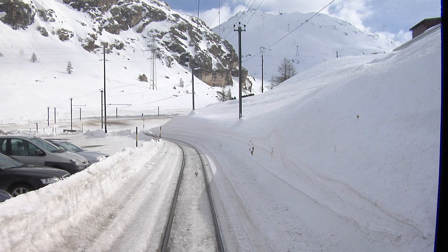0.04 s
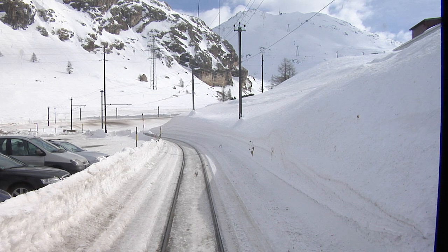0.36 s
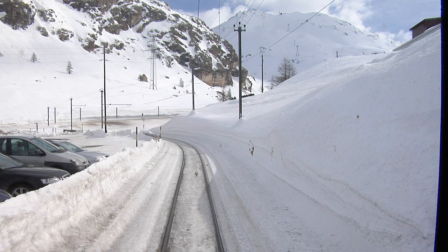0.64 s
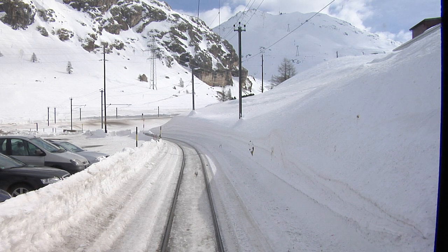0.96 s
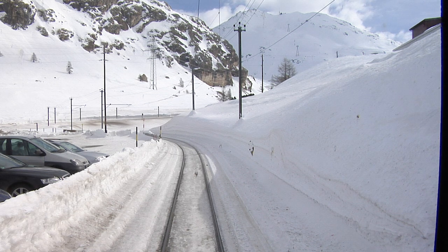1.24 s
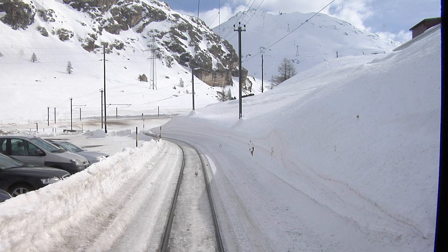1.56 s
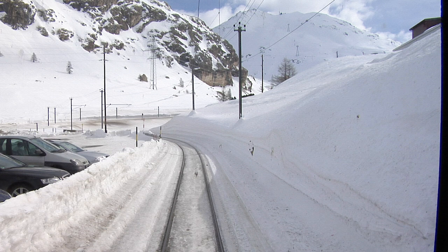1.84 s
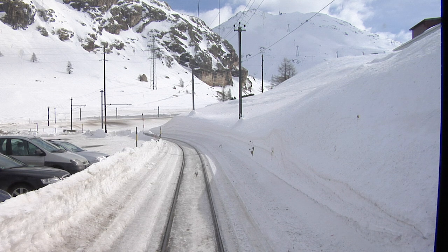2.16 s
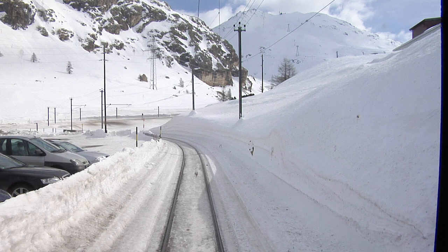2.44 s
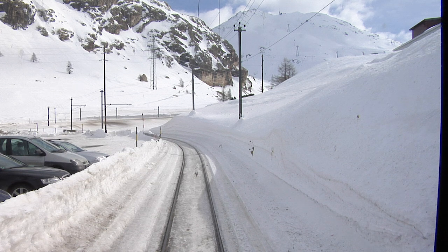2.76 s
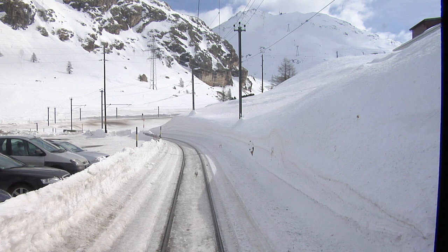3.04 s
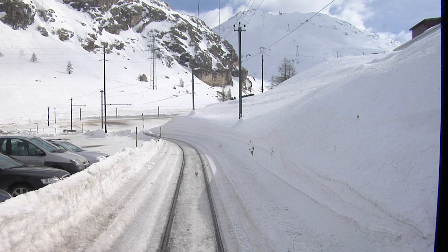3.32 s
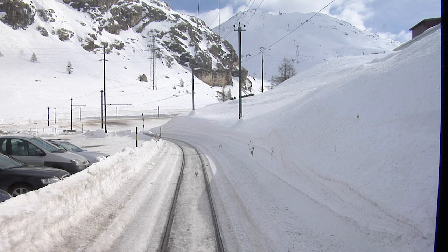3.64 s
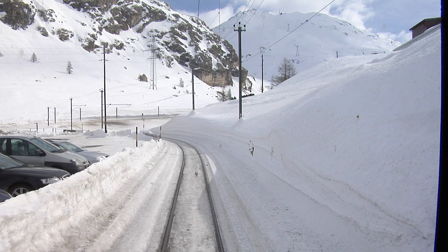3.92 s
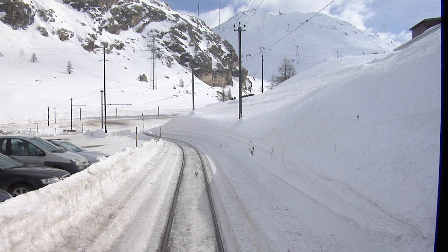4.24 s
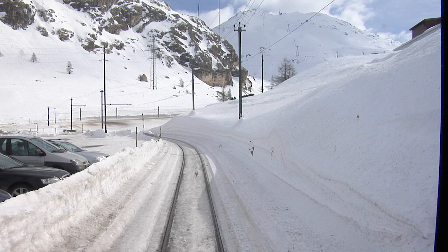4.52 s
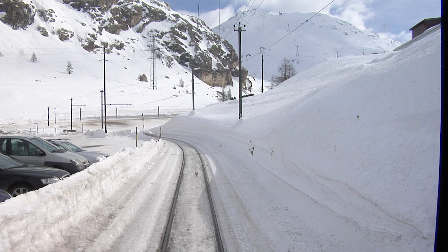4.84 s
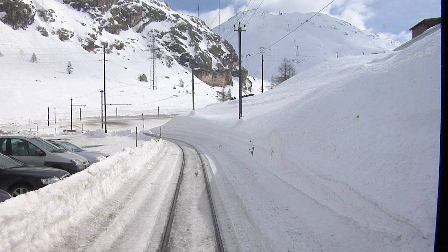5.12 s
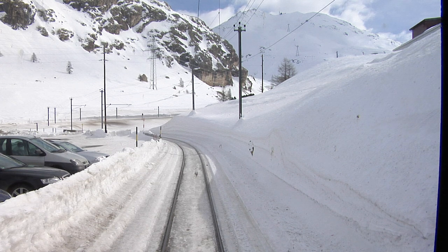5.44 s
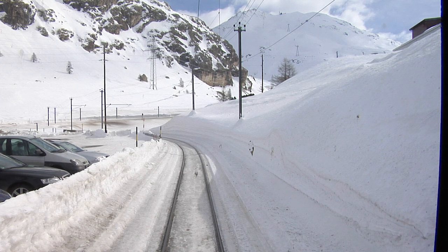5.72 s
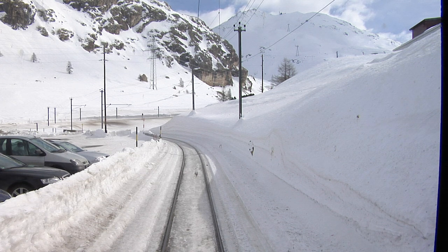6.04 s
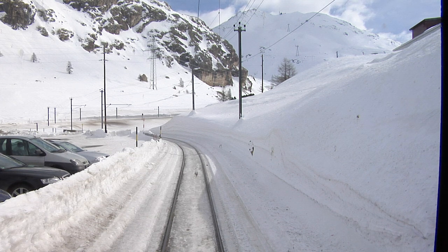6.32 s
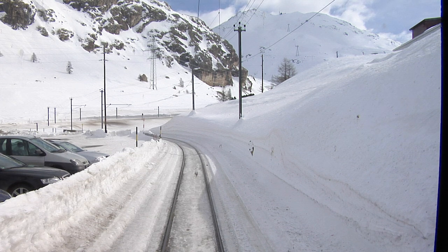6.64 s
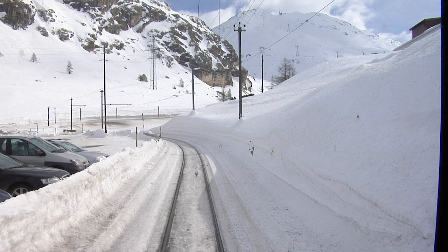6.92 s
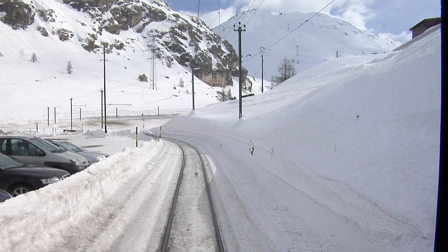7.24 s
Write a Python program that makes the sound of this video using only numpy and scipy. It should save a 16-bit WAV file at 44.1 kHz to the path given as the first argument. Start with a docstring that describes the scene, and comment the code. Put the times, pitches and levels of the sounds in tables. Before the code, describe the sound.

A steady two-toned hum from electrical equipment and a fan dominates the enclosed cab of a waiting train, heard from inside with a faint buzz and gently moving air. Early on, clothing rubs quietly against a seat in two short bouts, the second with brief squeaky creaks. The hum carries on alone for a while, until the cab body gives a few muffled low thuds toward the end.

```python
"""The cab of an electric train, standing with its equipment running.
Rectifier ripple and a cooling blower hum as two strong low tones, each part of a harmonic series,
under a thin buzz, faint wandering motor tones and a soft rush of air that excites the cab's resonances.
Someone shifts in the seat: friction rustles the cloth, and stick-slip gives small creaks.
Near the end the damped low modes of the cab body sound a few soft thuds."""
import sys
import numpy as np
from scipy import signal
from scipy.fft import rfft, irfft, next_fast_len
from scipy.io import wavfile

SR = 44100
rng = np.random.default_rng(int(sys.argv[2]) if len(sys.argv) > 2 else 0)


def dump(signal):
    """Clip the signal to [-1, 1] and save it as 16-bit WAV at the path in sys.argv[1]."""
    limited = np.clip(np.atleast_2d(signal).T, -1, 1)
    pcm = np.round(limited * 32767).astype(np.int16)
    wavfile.write(sys.argv[1], SR, pcm)


N = 321048
TIME = np.arange(N) / SR

# Strongest tones of the hum: supply_multiple, level_db, change_after_move_db
SUPPLY_HARMONICS = [(4, -67, 0), (6, -37.7, -.3), (8, -73, 3), (12, -60, .5), (32, -73, 1),
                    (34, -75.3, 5.3), (38, -82, 4), (46, -76, -2), (72, -83, 3), (108, -87.5, .5)]
# Line levels of the transformer core, on even multiples: frequency_hz, level_db
CORE_SPECTRUM = [(1200, -77.5), (1400, -93), (2000, -76.5), (2200, -88), (2520, -80.5), (2700, -96),
                 (4000, -108)]
# Line levels of the six-pulse rectifier, on each sixth multiple and its neighbours: frequency_hz, level_db
RECTIFIER_SPECTRUM = [(2400, -92.5), (3150, -86), (3700, -92.5), (4300, -90.5), (4600, -100.5), (5500, -94),
                      (6600, -100), (8500, -108)]
# Line levels of the faint buzz, on every multiple: frequency_hz, level_db
BUZZ_SPECTRUM = [(2400, -96.5), (3600, -99), (5400, -104), (8500, -112)]

def electrical_hum(moved, supply_hz, scatter_db):
    """Harmonic series locked to the supply; the sixth harmonic, the rectifier ripple, dominates."""
    cycles = supply_hz * TIME
    hum = sum(from_db(db + change * moved) * tone(k * cycles) for k, db, change in SUPPLY_HARMONICS)
    strongest = [row[0] for row in SUPPLY_HARMONICS]
    for k in range(24, 168):
        spectra = [BUZZ_SPECTRUM]
        if k % 2 == 0:
            spectra.append(CORE_SPECTRUM)
        if k % 6 in (0, 1, 5):
            spectra.append(RECTIFIER_SPECTRUM)
        db = max(at_hz(spectrum, k * supply_hz) for spectrum in spectra)
        db += scatter_db * rng.uniform(-1, 1)   # panels pass some multiples better than others
        if k not in strongest:
            hum += from_db(db) * tone(k * cycles)
    return hum


# Strongest tones of the blower: shaft_multiple, level_db, change_after_move_db
SHAFT_HARMONICS = [(6, -70, 2), (8, -44.5, -1.3), (12, -56, -.7), (15, -73, 3), (16, -58.2, -3),
                   (17, -72, 3), (20, -67, -1), (24, -59.4, -.8), (40, -64.7, -13.7), (51, -76.5, 1)]

def blower(moved, shaft_hz, wobble, flutter_db):
    """Harmonics of one slightly unsteady shaft; turbulence modulates the amplitude of each."""
    turns = shaft_hz * (TIME + wobble * np.cumsum(drift(0.82)) / SR)
    # weaker overtones: -79 dB at 1 kHz, falling 1 dB per octave
    weak = [(k, -79 - np.log2(k * shaft_hz / 1000), 0) for k in (28, 32, 44, 48, 60)]
    return sum(from_db(db + change * moved + flutter_db * drift(4.1)) * tone(k * turns)
               for k, db, change in SHAFT_HARMONICS + weak)


# Pushes on the cab body: start_s, relative_level_db
PUSHES = [(6.19, -55), (6.497, -40), (6.711, -53), (6.985, -40), (7.189, -53)]
# Its lowest modes: frequency_hz, relative_level_db, decay_60_db_s
BODY_MODES = [(26.4, -2.5, 0.54), (34.5, -2, .3), (57, -8.5, 0.36), (88, -5.5, 0.3)]

def thuds(rise_s, gain_db):
    """Damped modal vibration: each soft push builds up in the body and decays exponentially."""
    out = np.zeros(N)
    for start_s, push_db in PUSHES:
        age = np.maximum(TIME - start_s, 0)
        build = 1 - np.exp(-(age / rise_s) ** 2)
        for hz, mode_db, t60 in BODY_MODES:
            out += build * from_db(gain_db + push_db + mode_db - 60 * age / t60) * tone(hz * age)
    return out


# How hard the sitter presses on the seat: time_s, relative_level_db
SEAT_LOAD = [(.12, -75), (.3, -59), (.82, -48.5), (.95, -75), (1.8, -68), (1.98, -52), (2.33, -55),
             (2.56, -47.5), (2.8, -51.5), (3.02, -76)]

def seat_effort():
    """Amplitude envelope of the friction: the load on the seat comes in two bouts."""
    return from_db(np.interp(TIME, *np.transpose(SEAT_LOAD)))


# Quick rubs of cloth: peak_s, relative_level_db
CLOTH_RUBS = [(.241, -58), (.313, -63), (.372, -62), (.474, -63), (.556, -65), (.654, -63), (.721, -62),
              (.781, -60.5), (.852, -64), (1.982, -63), (2.419, -65), (2.622, -60), (2.787, -60.5),
              (2.866, -65), (2.945, -67)]
# Spectrum of sliding cloth: frequency_hz, relative_density_db
CLOTH_SPECTRUM = [(250, -10), (500, 3), (850, 3), (1300, -1), (1800, -4), (2300, -1), (2800, 1.5),
                  (3400, -4), (4300, -14), (8000, -30), (15000, -55)]
# Spectrum of the seat under it: frequency_hz, relative_density_db
SEAT_SPECTRUM = [(60, -22), (100, -25), (132, -1.5), (210, 1), (280, -5), (340, 3.5), (450, -13),
                 (620, -13), (800, -16.5), (1200, -50)]

def rustles(effort, cloth_rub_db, cloth_effort_db, seat_rub_db, seat_effort_db):
    """Friction noise: cloth slips finely and the seat rumbles; rubs and effort add in power."""
    # a rub catches quickly and lets go more slowly
    rubs = sum(from_db(db) * np.where(TIME < peak_s, swell(peak_s, 0.0112), swell(peak_s, 0.044))
               for peak_s, db in CLOTH_RUBS)
    grains = rms_one(colour(friction(per_s=2200, spread_db=6.0), CLOTH_SPECTRUM))
    rumble = rms_one(colour(rng.standard_normal(N), SEAT_SPECTRUM))
    cloth_gain = np.hypot(from_db(cloth_rub_db) * rubs, from_db(cloth_effort_db) * effort)
    seat_gain = np.hypot(from_db(seat_rub_db) * rubs, from_db(seat_effort_db) * effort)
    return cloth_gain * grains + seat_gain * rumble


# Creaks of the seat: peak_s, length_s, relative_level_db, pitch_hz
SEAT_CREAKS = [(2.07, 0.31, -54.5, 937), (2.687, .045, -47.5, 884), (2.805, 0.071, -49.5, 1030),
               (2.882, 0.024, -55.5, 900), (2.953, 0.034, -53.5, 896)]
# Low and high resonances of its frame: frequency_hz, bandwidth_hz, relative_level_db
FRAME_LOW_MODES = [(882, 130, 4.5), (916, 47, 2.5), (983, 36, -5)]
FRAME_HIGH_MODES = [(1660, 100, 2), (2003, 170, -1), (2350, 180, -7)]

def creaks(effort, creak_db, strain_db, snap_db, padding_hz):
    """Stick-slip excitation: slips, low-passed by the padding, ring the seat frame."""
    creaking = sum(from_db(db) * swell(peak_s, length_s) for peak_s, length_s, db, _ in SEAT_CREAKS)
    low_gain = np.hypot(from_db(creak_db) * creaking, from_db(strain_db) * effort)
    high_gain = from_db(snap_db) * swell(peak_s=2.797, length_s=0.04)   # the frame gives way once
    padding = signal.butter(2, padding_hz, fs=SR, output="sos")
    slips = signal.sosfilt(padding, friction(per_s=820, spread_db=2.5))
    low_ring = rms_one(resonate(slips, FRAME_LOW_MODES))
    high_ring = rms_one(resonate(slips, FRAME_HIGH_MODES))
    return low_gain * low_ring + high_gain * high_ring


def squeaks(gain_db, waver, steady_s):
    """Periodic stick-slip: a short creak locks into a wavering pitch; a long one stays mostly a scuff."""
    out = np.zeros(N)
    for peak_s, length_s, db, hz in SEAT_CREAKS:
        locked = min(1, steady_s / length_s)
        cycles = hz * np.cumsum(1 + waver * drift(39.3)) / SR
        out += from_db(db + gain_db) * locked * swell(peak_s, length_s) * tone(cycles)
    return out


# Tones of the smaller motors: pitch_hz, level_db, wander_hz
MOTOR_TONES = [(239.6, -56.5, .6), (244.3, -62, .6), (569.3, -63, 1.2), (153.4, -64, 1.5), (895, -71.5, .6)]

def motors():
    """Random frequency modulation makes each tone wander; the close pair beats by interference."""
    return sum(from_db(db) * tone(hz * TIME + wander_hz * np.cumsum(drift(1.69)) / SR)
               for hz, db, wander_hz in MOTOR_TONES)


# Spectrum of the rush and hiss: frequency_hz, relative_density_db
AIR_SPECTRUM = [(20, -101), (60, -82), (110, -75.5), (200, -84), (320, -80.5), (450, -83.5), (620, -85),
                (720, -88.5), (900, -90), (1700, -95.5), (2500, -102.6), (3600, -108.9), (7000, -112.3),
                (15000, -114.4)]
# Air resonances of the cab: frequency_hz, bandwidth_hz, relative_level_db
CAVITY_MODES = [(26, 5, -70), (43.3, 4, -68), (89.7, 20.6, -61.5), (129, 4.4, -67.5), (154.7, 3.7, -66.5),
                (187, 20, -61.5), (209, 12, -68.5), (284.2, 10, -58.5), (330.5, 34, -63), (477.7, 16, -65),
                (579, 48, -66.5), (627, 14, -70), (860, 13, -75.5), (1256, 44, -75.5), (1760, 26, -77),
                (2000, 39, -83.5)]

def air(rush_db, modes_db):
    """Broadband excitation: moving air rushes and keeps the cab's resonances sounding."""
    white = rng.standard_normal(N) * np.sqrt(SR / 2)   # unit power per hertz
    rush = colour(white, AIR_SPECTRUM)
    resonances = resonate(rng.standard_normal(N), CAVITY_MODES)
    return from_db(rush_db) * rush + from_db(modes_db) * resonances


def friction(per_s, spread_db):
    """Poisson impulse train: tiny slips of uneven size at random moments."""
    slipping = rng.random(N) < per_s / SR
    return slipping * rng.choice([-1, 1], N) * from_db(spread_db * rng.standard_normal(N))


def resonate(x, modes):
    """Modal superposition: parallel resonators of alternating sign, each at its own rms level."""
    out = np.zeros(N)
    for k, (hz, bandwidth_hz, db) in enumerate(modes):
        radius = np.exp(-np.pi * bandwidth_hz / SR)
        feedback = [1, -2 * radius * np.cos(2 * np.pi * hz / SR), radius * radius]
        out += (-1) ** k * from_db(db) * rms_one(signal.lfilter([1, 0, -1], feedback, x))
    return out


def colour(x, spectrum):
    """Spectral shaping, with a roll-off below the 16 Hz limit of hearing."""
    size = next_fast_len(N)
    hz = np.arange(size // 2 + 1) * SR / size
    audible = 1 - np.exp(-(hz / 16) ** 4)
    return irfft(rfft(x, size) * from_db(at_hz(spectrum, hz)) * audible, size)[:N]


def drift(corner_hz):
    """Low-passed Gaussian noise: a slow fluctuation of rms 1."""
    hop, settle = 100, 1000
    pole = np.exp(-2 * np.pi * corner_hz * hop / SR)
    noise = rng.standard_normal(N // hop + settle + 2)
    slow = signal.lfilter([1], [1, -2 * pole, pole * pole], noise)[settle:]
    return np.interp(np.arange(N) / hop, np.arange(len(slow)), rms_one(slow))


def swell(peak_s, length_s):
    """Gaussian envelope, two standard deviations to the length."""
    return np.exp(-np.minimum(2 * ((TIME - peak_s) / length_s) ** 2, 25))


def tone(cycles):
    """Sinusoid of rms 1 with a random starting phase."""
    return np.sqrt(2) * np.sin(2 * np.pi * (cycles + rng.random()))


def at_hz(spectrum, hz):
    """Interpolation of levels on a log-frequency axis."""
    freqs, levels = np.transpose(spectrum)
    return np.interp(np.log(np.maximum(hz, 1)), np.log(freqs), levels)


def rms_one(x):
    """Normalisation to an rms of 1."""
    return x / np.sqrt(np.mean(x ** 2) + 1e-20)


def from_db(db):
    """Decibels to amplitude ratio."""
    return 10 ** (np.asarray(db) / 20)


def scene():
    """Superposition of steady machinery, small movements and air, in one channel."""
    # a body moving in the cab shifts its standing waves, so the loud tones settle at new levels
    move_start_s, move_end_s = 2.1, 2.8
    moved = np.interp(TIME, [move_start_s, move_end_s], [0, 1])
    hum = electrical_hum(moved, supply_hz=50.451, scatter_db=3)
    machinery = hum + blower(moved, shaft_hz=24.75, wobble=0.0006, flutter_db=0.43) + motors()
    effort = seat_effort()
    seat = rustles(effort, cloth_rub_db=-1.5, cloth_effort_db=-20, seat_rub_db=11.5, seat_effort_db=2.5)
    seat += creaks(effort, creak_db=-3, strain_db=-12.5, snap_db=-51.5, padding_hz=2830)
    seat += squeaks(gain_db=-4.0, waver=0.02, steady_s=0.045)
    body = thuds(rise_s=0.055, gain_db=10.5)
    return (machinery + seat + body + air(rush_db=-0.15, modes_db=1.2))[None]


def record(dry):
    """Band limiting: a steep elliptic low-pass cuts the highest treble."""
    cutoff_hz = 15900
    return signal.sosfilt(signal.ellip(12, .1, 80, cutoff_hz, fs=SR, output="sos"), dry)


dry = scene()
out = record(dry)
dump(out)
```